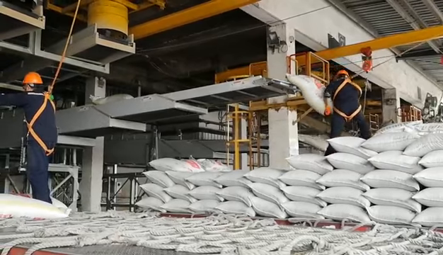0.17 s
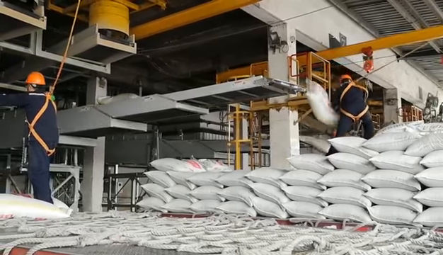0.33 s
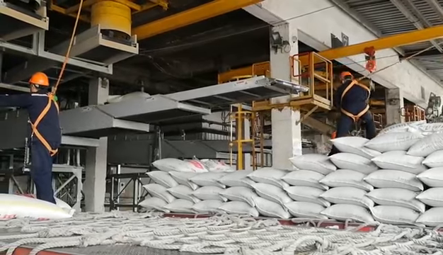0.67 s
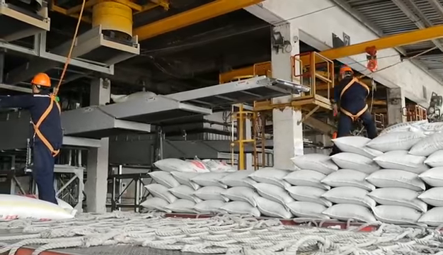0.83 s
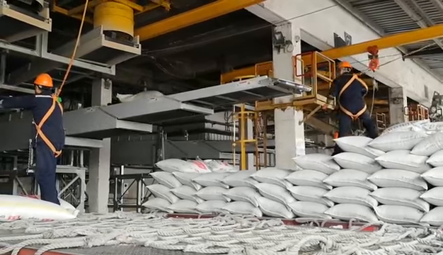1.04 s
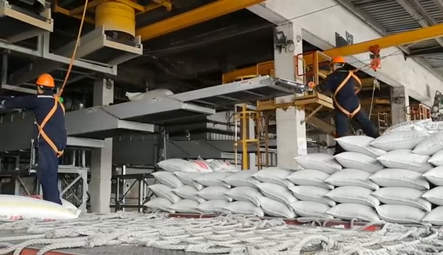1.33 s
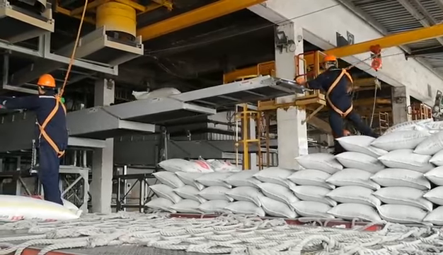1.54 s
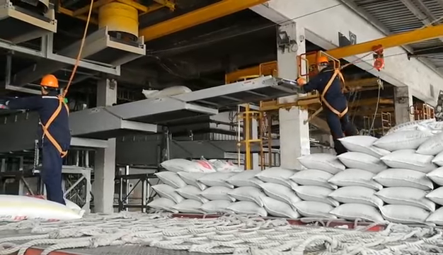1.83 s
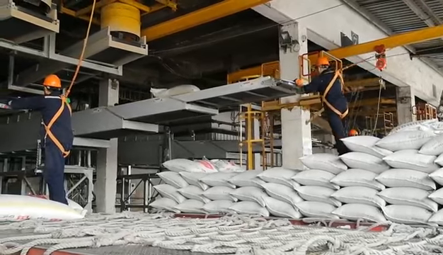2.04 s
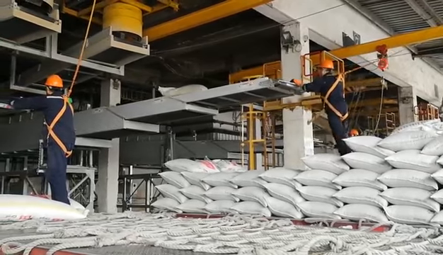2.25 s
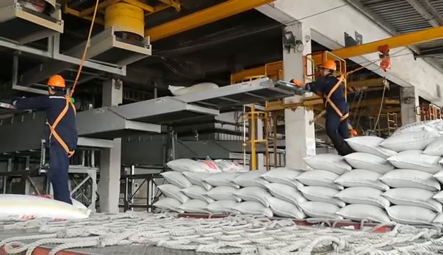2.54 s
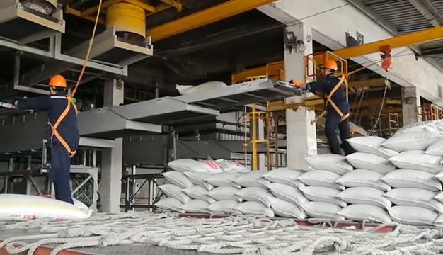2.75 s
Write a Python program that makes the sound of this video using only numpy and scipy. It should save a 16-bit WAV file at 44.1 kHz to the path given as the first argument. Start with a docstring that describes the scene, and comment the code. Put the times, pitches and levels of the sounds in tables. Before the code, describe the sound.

Low humming roar of a running belt conveyor, a thin roller squeal, then a bumpy metallic clatter

```python
"""A belt conveyor carries sacks through a large hall: its drive hums at multiples of a shaft rate, a motor
whines, and the rollers rattle as random clicks spread by reflections. A dry roller squeals as a gliding
friction tone and fades. Loads thud on the belt as decaying low noise, and the steel frame clatters as noise
coloured by its resonances. Woven sacks slide with soft swells of treble noise. Behind it all lie the broad
roar of the machinery and the narrow noise bands of the ringing frame."""
import sys
import numpy as np
from scipy import signal
from scipy.fft import rfft, irfft, next_fast_len
from scipy.io import wavfile

SR = 44100
rng = np.random.default_rng(int(sys.argv[2]) if len(sys.argv) > 2 else 0)


def transcribe(u):
    """Save the signal u as a 16-bit wav file named by the first command-line argument.

    u: samples, shape (n,) or (channels, n), limited to [-1, 1]; the rate is SR.
    q: integer samples, one column per channel.
    """
    v = np.clip(np.atleast_2d(u).T, -1, 1)
    q = np.round(v * 32767).astype(np.int16)
    wavfile.write(sys.argv[1], SR, q)


N = 127449
TIME = np.arange(N) / SR  # s
CUTOFF_HZ = 7600


def from_db(db):
    """Logarithmic level: 20 dB is a tenfold amplitude."""
    return 10 ** (np.asarray(db) / 20)


def rms_one(x):
    """Normalisation: scale to unit mean power."""
    return x / np.sqrt(np.mean(x ** 2) + 1e-20)


def at_hz(points, hz):
    """Logarithmic frequency scale: interpolate a table along it."""
    f, value = np.transpose(points)
    return np.interp(np.log(hz + 1e-9), np.log(f), value)


def gain_curve(points):
    """Amplitude envelope: gain over time from rows of (t/s, level/dB)."""
    return from_db(np.interp(TIME, *np.transpose(points)))


def pan(db):
    """Level difference between left and right at constant total power."""
    gains = from_db(np.array([[.5], [-.5]]) * db)
    return gains / np.sqrt(np.mean(gains ** 2, axis=0))


def drift(rate_hz):
    """Low-passed random fluctuation: noise through a double pole, with unit spread."""
    step = 40  # samples between computed values
    pole = np.exp(-2 * np.pi * rate_hz * step / SR)
    noise = rng.standard_normal(N // step + 2002)
    slow = signal.lfilter([1], [1, -2 * pole, pole * pole], noise)[2000:]  # start-up dropped
    return np.interp(np.arange(N) / step, np.arange(len(slow)), rms_one(slow))


def wavering(hz, waver, rate_hz):
    """Narrow-band modulation: two quadrature parts fluctuate, so strength and phase wander; unit power."""
    phase = 2 * np.pi * (hz * TIME + rng.random())
    in_phase = (1 + waver * drift(rate_hz)) * np.sin(phase)
    return rms_one(in_phase + waver * drift(rate_hz) * np.cos(phase))


def wandering_tone(pitch_hz):
    """Frequency modulation: phase is the running sum of frequency; unit power."""
    return rms_one(np.sin(2 * np.pi * np.cumsum(pitch_hz) / SR))


def blow(start, attack, t60):
    """Impact envelope: a straight rise, then exponential decay by 60 dB in t60."""
    age = TIME - start
    return np.clip(age / attack, 0, 1) * from_db(-60 * np.maximum(age - attack, 0) / t60)


def hall(x, t60):
    """Reverberation: convolution with a decaying dense tail, independent on each side."""
    tail = rng.standard_normal((2, SR)) * from_db(-60 * TIME[:SR] / t60)
    tail /= np.sqrt(np.sum(tail ** 2, axis=1, keepdims=True))
    return signal.fftconvolve(x[None], tail, axes=1)[:, :N]


# Coherence of the hall's sound field: f/Hz, left-right correlation
HALL_COHERENCE = [(40, .998), (70, .975), (110, .96), (180, .96), (300, .91), (390, .65), (520, .1),
                  (830, .12), (1200, .3), (1750, .03), (2660, -.09), (4500, .05), (7000, 0)]


def diffuse(gain_at):
    """Diffuse field: coloured stereo noise, alike in the bass and nearly unrelated in the treble."""
    size = next_fast_len(N, True)
    hz = np.fft.rfftfreq(size, 1 / SR)
    mid, side = rfft(rng.standard_normal((2, size)))
    alike = np.clip(at_hz(HALL_COHERENCE, hz), -1, 1)
    both = np.sqrt(1 + alike) * mid + np.sqrt(1 - alike) * side * [[1], [-1]]
    in_band = (hz > 10) * (hz < CUTOFF_HZ)
    return rms_one(irfft(both * gain_at(hz) * in_band, size)[:, :N])


# Tones of the drive: multiple of the shaft rate, level/dB (the last before its swell),
# waver as a share, waver rate f/Hz
HUM_TONES = [(1, -32.5, .6, 16), (2, -38, 1, 4.7), (3, -20.5, 0.08, 30)]
# Swell of the last tone, which surges under the thuds: t/s, level/dB relative to that tone
HUM_SWELL = [(0, 1), (.035, 5), (.1, -3), (.16, 4.5), (.25, 0), (.36, 0.5), (.57, -2.5), (.625, -7),
             (.72, 1.5), (.93, 2), (1.0, -2), (1.09, 0.5), (1.152, 10), (1.2, -5.5), (1.243, 5.5),
             (1.3, -2.5), (1.46, -3), (1.7, 1.5), (1.93, -5), (2.05, 0.5), (2.3, 1), (2.5, -2.5),
             (2.57, 4.5), (2.63, -7), (2.68, 0.5), (2.89, -3)]
SHAFT_HZ = 34.77
HUM_SIDE_DB = -19  # out-of-phase part relative to the last tone


def drive_hum():
    """Harmonics of rotation: low multiples of the shaft rate throb; the highest swells, uneven across the hall."""
    *throb, drone = [from_db(db) * wavering(order * SHAFT_HZ, waver, rate)
                     for order, db, waver, rate in HUM_TONES]
    order, db = HUM_TONES[-1][:2]
    opposed = wavering(order * SHAFT_HZ, waver=1.5, rate_hz=4) * [[1], [-1]]
    uneven = from_db(db + HUM_SIDE_DB) * opposed
    return sum(throb) + (drone + uneven) * gain_curve(HUM_SWELL)


# Level of the motor whine: t/s, level/dB
WHINE_LEVEL = [(0, -44), (1.5, -49.5), (1.95, -37.5), (2.3, -40.5), (2.89, -37.5)]
WHINE_HZ, WHINE_PAN_DB = 2776, -3.5
WHINE_WAVER, WHINE_WAVER_HZ = .4, 14


def motor_whine():
    """Narrow-band tone: one steady pitch wavers independently on each side."""
    sides = np.array([wavering(WHINE_HZ, WHINE_WAVER, WHINE_WAVER_HZ) for side in range(2)])
    return sides * gain_curve(WHINE_LEVEL) * pan(WHINE_PAN_DB)


# Level of the rollers' rattle: t/s, level/dB
ROLLER_LEVEL = [(0, -34), (.45, -38), (.7, -31.5), (1, -34), (1.65, -33.5), (2, -34.5), (2.89, -36)]
RATTLES_PER_S, RATTLE_SPREAD_DB, RATTLE_PAN_DB = 170, 2, -11.5
HALL_T60_S = 1.2


def rollers(low_hz=800, high_hz=3300, echo_db=0):
    """Random impulse train: small contacts of belt and rollers, band-limited and reverberated short and long."""
    sizes = from_db(RATTLE_SPREAD_DB * np.minimum(rng.exponential(1, N), 3))
    signed_sizes = sizes * rng.choice([-1, 1], N)
    clicks = signed_sizes * (rng.random(N) < RATTLES_PER_S / SR)
    band = signal.butter(2, [low_hz, high_hz], "band", fs=SR, output="sos")
    ticks = signal.sosfilt(band, clicks + 1e-18)
    ticks = signal.sosfilt(signal.butter(2, high_hz, fs=SR, output="sos"), ticks)
    spread = hall(ticks, t60=0.21) + from_db(echo_db) * hall(ticks, t60=HALL_T60_S)
    return gain_curve(ROLLER_LEVEL) * pan(RATTLE_PAN_DB) * rms_one(spread)


SQUEAL_ECHO_DB = 2.5  # reflections relative to the direct tone


def with_reflections(tone, t60):
    """Superposition: direct tone and its reflections beat, at about constant power."""
    echo = from_db(SQUEAL_ECHO_DB)
    return (tone + echo * hall(tone, t60)) / np.hypot(1, echo)


# Glide of the squealing roller: t/s, f/Hz, level/dB
SQUEAL_GLIDE = [(0, 5050, -35), (0.137, 5032, -41), (0.299, 5120, -38.5), (0.518, 5168, -37.5),
                (.78, 5102, -35), (0.929, 5013, -40), (1.031, 4930, -43), (1.349, 4730, -50.5),
                (1.55, 4700, -58)]
# Moments when the roller loses its grip: t/s, length/s
GRIP_LOSSES = [(0.202, 0.0084), (0.589, 0.013), (0.64, 0.0028), (0.855, 0.0058)]
SQUEAL_JITTER_HZ, SQUEAL_RASP_HZ, SQUEAL_FLUTTER_DB = 22.6, 24, 1.3
THROB_HZ, THROB_DEPTH, THROB_WANDER = 30, .22, .2


def squeal():
    """Friction oscillation: a gliding, throbbing tone breaks off briefly and beats against its reflections."""
    t, hz, db = np.transpose(SQUEAL_GLIDE)
    pitch = np.interp(TIME, t, hz) + SQUEAL_JITTER_HZ * drift(23) + SQUEAL_RASP_HZ * drift(160)
    level_db = np.interp(TIME, t, db, right=-np.inf) + SQUEAL_FLUTTER_DB * drift(30)
    tone = from_db(level_db) * wandering_tone(pitch)
    grip = np.prod([1 - np.exp(-((TIME - at) / length) ** 4) for at, length in GRIP_LOSSES], axis=0)
    throb_rate = THROB_HZ * (1 + THROB_WANDER * drift(8.9))
    throb = 1 + THROB_DEPTH * np.sin(2 * np.pi * np.cumsum(throb_rate) / SR)
    return grip * throb * with_reflections(tone, t60=0.57)


# Short squeaks: t/s, f/Hz, level/dB, attack/s, decay t60/s, rasp as frequency spread/Hz
SQUEAK_EVENTS = [(1.251, 6780, -32, 0.0058, 0.3, 22.3), (1.76, 4990, -47.5, .05, 0.53, 60)]


def squeaks():
    """Frequency-modulated bursts: short raspy tones with their early reflections."""
    out = 0
    for start, hz, db, attack, t60, rasp_hz in SQUEAK_EVENTS:
        chirp = wandering_tone(hz + rasp_hz * drift(140))
        chirp = from_db(db) * blow(start, attack, t60) * chirp
        out = out + with_reflections(chirp, t60=0.046)
    return out


# Thuds of a load on the belt: t/s, level/dB, decay t60/s
THUD_EVENTS = [(1.108, -18, 0.54), (1.16, -15, 0.39), (1.196, -20, 0.8), (1.252, -28, 0.4),
               (1.276, -22, 0.15), (1.913, -24.5, 0.16), (2.522, -26, 0.32), (2.66, -25, 0.57),
               (2.787, -20, .35)]
# Relative spectrum of a thud: f/Hz, level/dB
THUD_SPECTRUM = [(40, -11), (70, -5), (105, 2), (150, -1), (200, 3.5), (290, -9.5), (420, -26.5),
                 (900, -14.5), (3000, -61)]
THUD_ATTACK_S = 0.014


def thuds():
    """Damped impact: low-pitched diffuse noise under a fast rise and exponential decay."""
    out = 0
    for start, db, t60 in THUD_EVENTS:
        noise = diffuse(lambda hz: from_db(at_hz(THUD_SPECTRUM, hz)))
        out = out + from_db(db) * blow(start, THUD_ATTACK_S, t60) * noise
    return out


# Knocks of the steel frame: t/s, level/dB (of the ring), centre f/Hz, left minus right level/dB,
# opening crack as a multiple of the ring
KNOCK_EVENTS = [(0.638, -32.5, 1000, 15, 0), (0.738, -30, 2050, -3, 0), (1.181, -30, 600, -0.5, .3),
                (1.24, -23.5, 758, 11, .3), (1.25, -24, 1790, -6, .4), (1.303, -25.5, 1713, -6, 5),
                (1.318, -24, 1750, -10, 2), (1.326, -25, 1200, -11, 1.4), (1.366, -27.5, 1085, 5.5, 1.3),
                (1.385, -25.5, 430, 0, .3), (1.406, -26.5, 1750, -4, 1), (1.455, -31.5, 1280, -1, .5),
                (2.598, -29, 3200, -7, 0), (2.62, -35, 2800, 3, 1.5), (2.631, -33, 650, 1, .3),
                (2.8, -32, 2500, -8, .5)]
KNOCK_ATTACK_S, KNOCK_T60_S = .012, .5
CRACK_ATTACK_S, CRACK_T60_S = .0008, .022
KNOCK_WIDTH_OCT, KNOCK_TOP_HZ = 0.77, 3240


def clatter(chatter_db=-2.5, ring_db=6, ring_width_hz=28):
    """Modal excitation: each knock chatters, stirs the resonances around its own pitch and decays."""
    out = 0
    for start, db, centre_hz, side_db, crack in KNOCK_EVENTS:
        def colour(hz):
            """Resonance: the frame's modes stand out from a broad hump."""
            octaves = np.log2((hz + 1) / centre_hz)
            hump = np.exp(-.5 * (octaves / KNOCK_WIDTH_OCT) ** 2)
            rings = sum(1 / (1 + ((hz - mode[0]) / ring_width_hz) ** 2) for mode in FRAME_MODES)
            return hump * from_db(ring_db * rings) / np.sqrt(1 + (hz / KNOCK_TOP_HZ) ** 10)
        ring = blow(start, KNOCK_ATTACK_S, KNOCK_T60_S)
        envelope = ring + crack * blow(start, CRACK_ATTACK_S, CRACK_T60_S)
        level = from_db(db + chatter_db * drift(80))
        out = out + level * envelope * pan(side_db) * diffuse(colour)
    return out


# Sliding sacks: t/s of the height, level/dB, rise/s, fall/s, spectral tilt/(dB per octave)
SLIDE_EVENTS = [(.78, -38.5, 0.045, 0.063, -3.5), (1.13, -39.5, 0.024, 0.094, 1.5),
                (1.69, -45.5, 0.023, 0.035, -3), (2.401, -35.5, 0.12, 0.23, -0.5),
                (2.57, -32.5, 0.058, 0.07, -11), (2.81, -31.5, 0.087, 0.076, -4.5),
                (2.875, -27.5, 0.067, .1, 3)]
# Relative spectrum of the hiss before tilting: f/Hz, level/dB
SLIDE_SPECTRUM = [(1500, -34.5), (3000, -2), (4000, -4.5), (5000, -4.5), (6200, -1), (7400, 1)]
SLIDE_PIVOT_HZ = 5000


def sacks():
    """Friction noise: woven plastic hisses in bell-shaped swells, each with its own spectral tilt."""
    out = 0
    for peak, db, rise, fall, tilt_db in SLIDE_EVENTS:
        def colour(hz):
            """Spectral tilt about a pivot, constant from one octave below it."""
            octaves = np.log2(np.maximum(hz / SLIDE_PIVOT_HZ, .5))
            return from_db(at_hz(SLIDE_SPECTRUM, hz) + tilt_db * octaves)
        swell = np.exp(-((TIME - peak) / np.where(TIME < peak, rise, fall)) ** 2)
        out = out + from_db(db) * swell * diffuse(colour)
    return out


# Resonances of the steel frame: f/Hz, half-width at half amplitude/Hz, level/dB, left minus right level/dB
FRAME_MODES = [(173, 7.9, -44, 5), (203.7, 12, -38, -2.5), (308.4, 1.8, -53, 10), (333.5, 15, -39, 0),
               (374.9, 3.9, -44.5, -4), (408.5, 3.1, -53.5, -6), (564.4, 21, -48, 4), (760, 11, -49.5, 16),
               (1347, 12, -63.5, 5.5), (1545, 3.6, -55, -4), (1885, 15, -44.5, 2.5), (1983, 12, -53, 4)]


def frame_ringing():
    """Forced resonance: the running belt keeps the frame's modes ringing as narrow bands of noise."""
    out = 0
    for centre_hz, width_hz, db, side_db in FRAME_MODES:
        ringing = diffuse(lambda hz: 1 / (1 + ((hz - centre_hz) / width_hz) ** 2))
        out = out + from_db(db) * pan(side_db) * ringing
    return out


# Relative spectrum of the machinery's roar: f/Hz, level/dB per Hz
ROAR_SPECTRUM = [(22, -5.5), (33, 9), (50, 0), (75, -1.5), (125, -3), (200, -9), (260, -10), (350, -18),
                 (470, -22), (650, -22), (900, -21.5), (1900, -22.5), (2800, -22), (3500, -27.5),
                 (4500, -37), (6000, -37.5), (7500, -40.5)]
# Stereo balance of the roar: f/Hz, left minus right level/dB
ROAR_SIDES = [(300, -1), (700, 3), (1260, 3.5), (2000, 1), (2700, -6), (3900, -1.5), (5000, 1.5),
              (7000, -1.5)]
ROAR_DB, ROAR_FLICKER_DB = -21, .5


def roar():
    """Broadband noise: a fixed spectrum and stereo balance, with a slight flicker in level."""
    noise = diffuse(lambda hz: from_db(at_hz(ROAR_SPECTRUM, hz)) * pan(at_hz(ROAR_SIDES, hz)))
    return noise * from_db(ROAR_DB + ROAR_FLICKER_DB * drift(22))


def scene():
    """Linear superposition: all sources in the hall add."""
    conveyor = drive_hum() + motor_whine() + rollers() + squeal() + squeaks()
    load = thuds() + clatter() + sacks()
    return conveyor + load + frame_ringing() + roar()


def record(dry):
    """Band limiting: a steep elliptic low-pass cuts the top."""
    return signal.sosfilt(signal.ellip(12, .2, 80, CUTOFF_HZ, fs=SR, output="sos"), dry)


dry = scene()
out = record(dry)
transcribe(out)
```